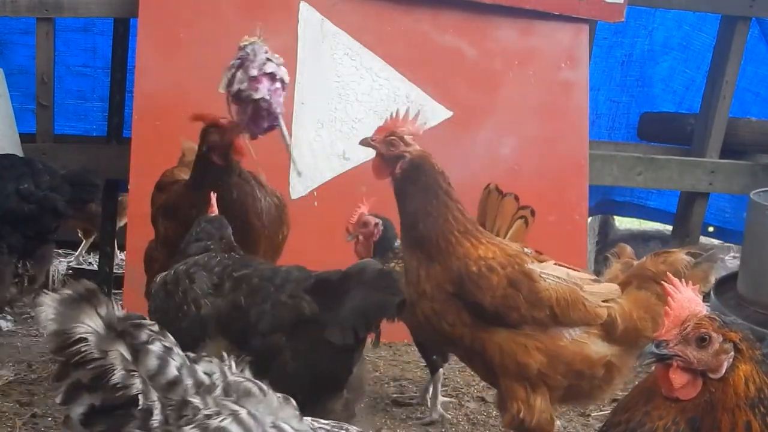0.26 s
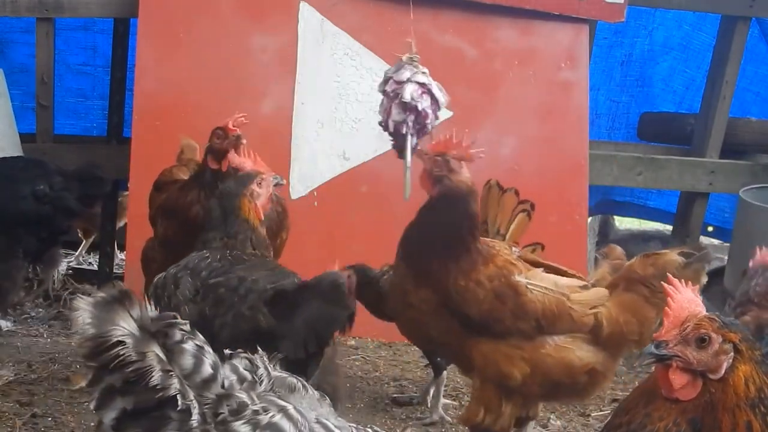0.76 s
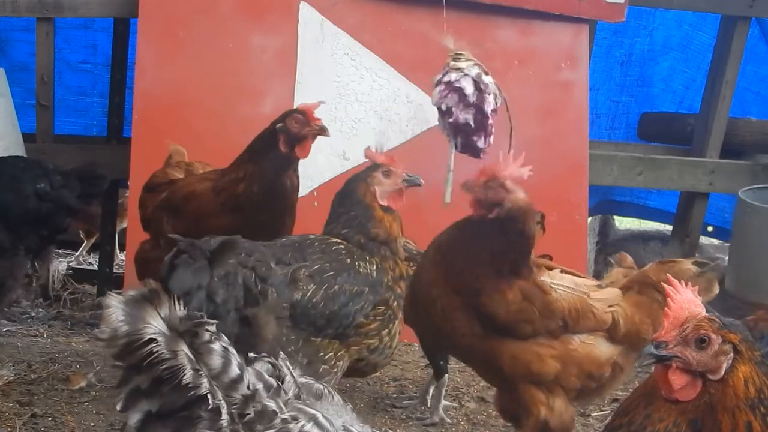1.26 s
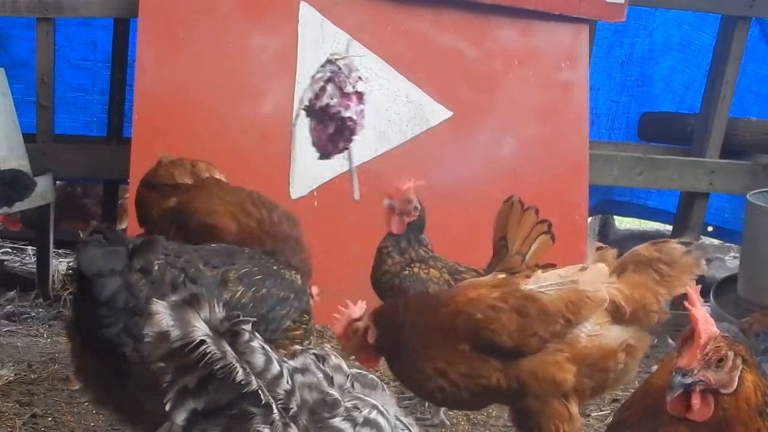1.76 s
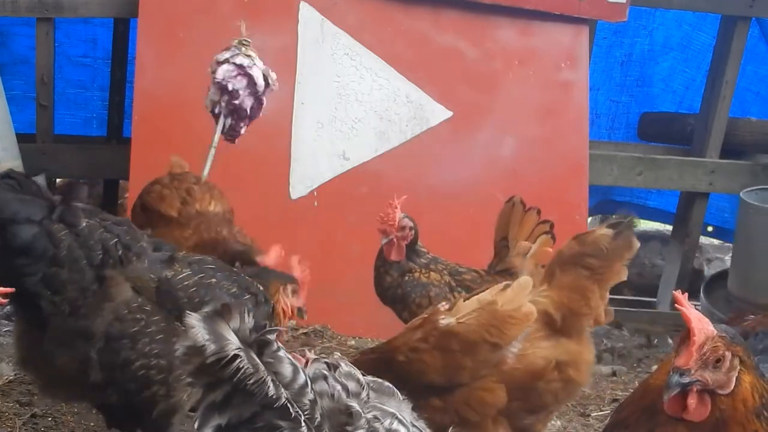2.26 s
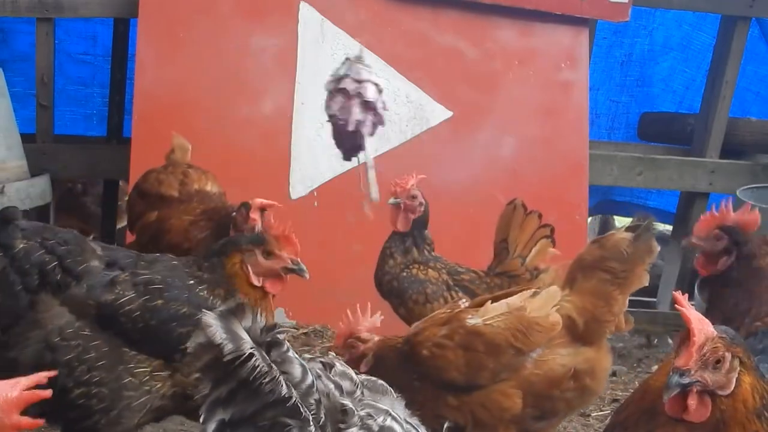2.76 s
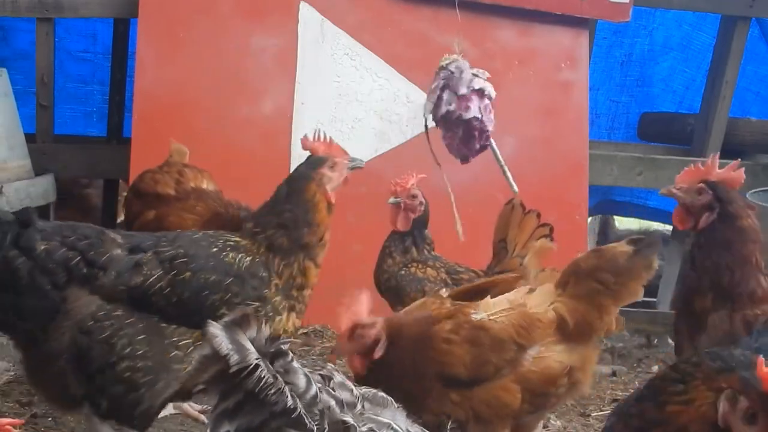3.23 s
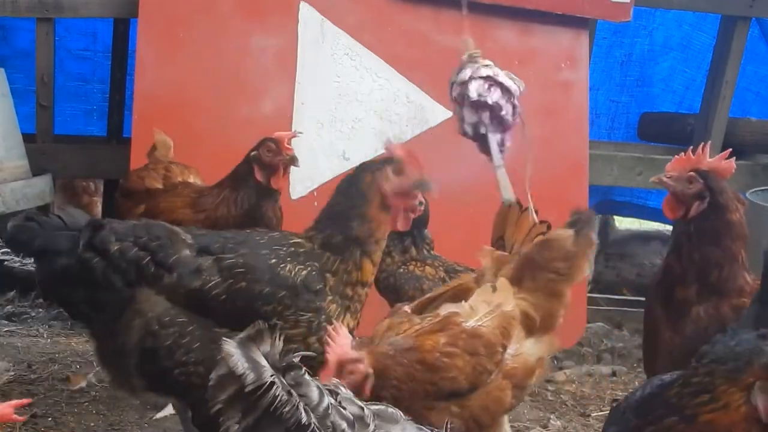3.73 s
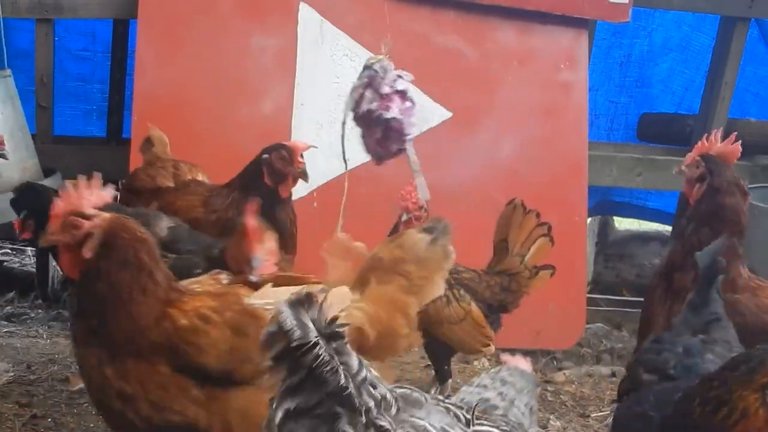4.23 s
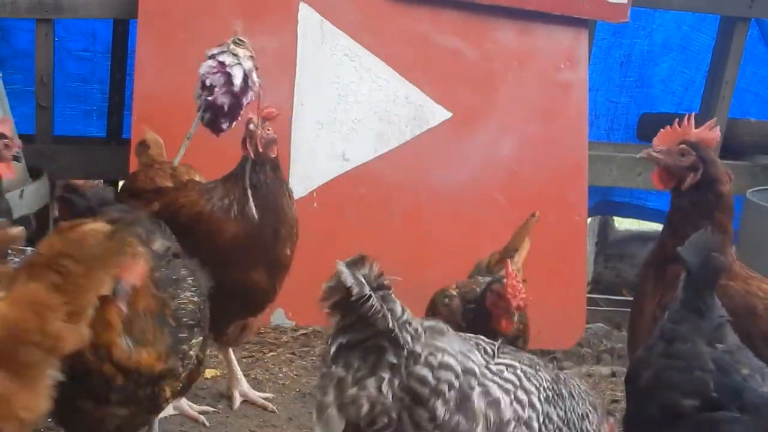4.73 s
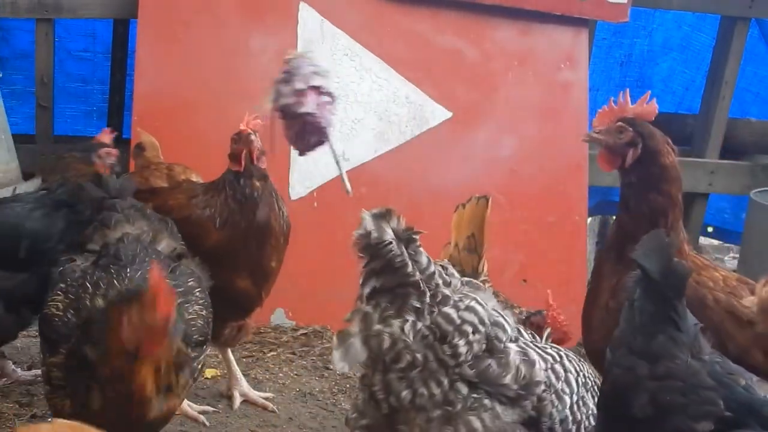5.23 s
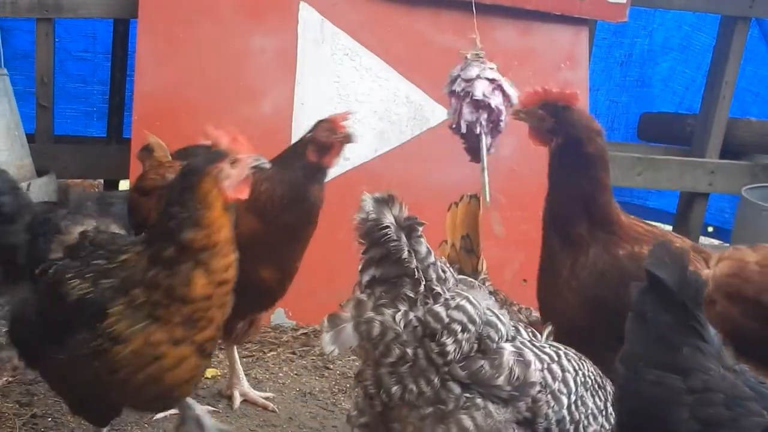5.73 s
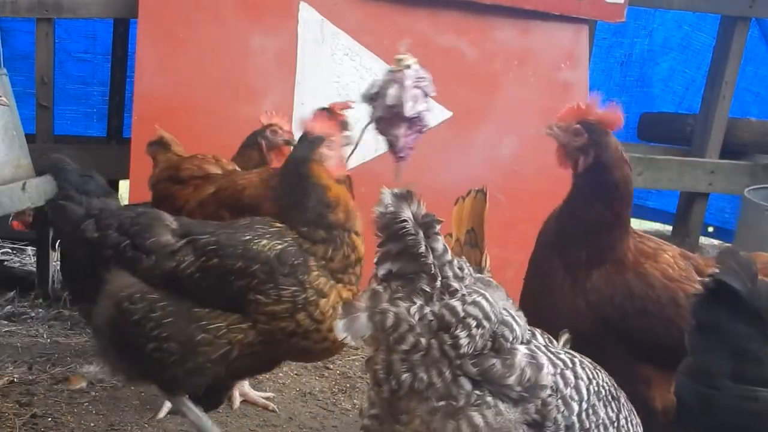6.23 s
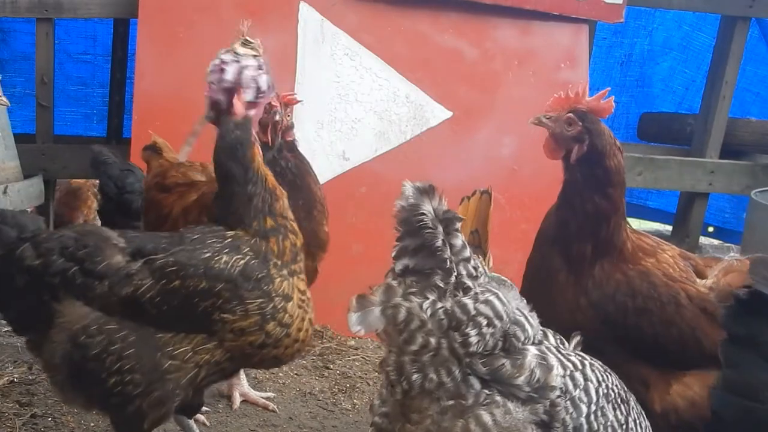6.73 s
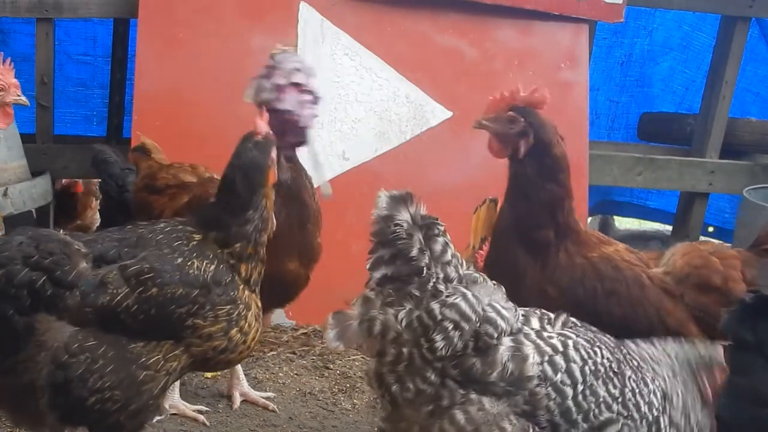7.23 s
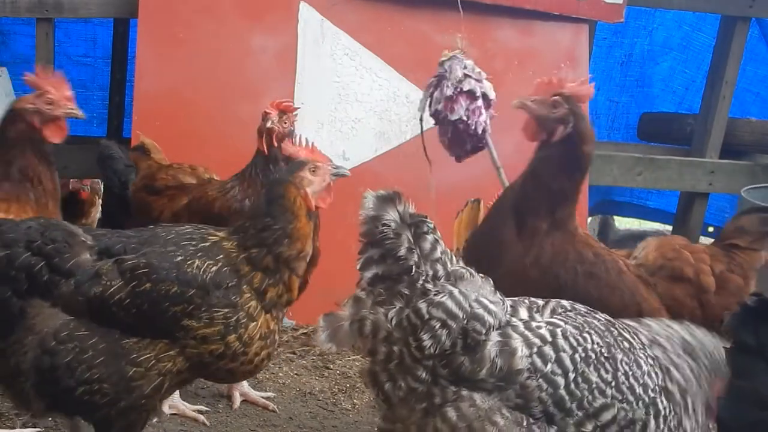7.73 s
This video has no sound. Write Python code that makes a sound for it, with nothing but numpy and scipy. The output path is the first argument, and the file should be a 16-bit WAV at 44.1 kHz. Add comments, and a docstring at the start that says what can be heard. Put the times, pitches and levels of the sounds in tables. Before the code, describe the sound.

Close stereo pickup in an outdoor hen run with quiet air and a faint wavering low hum. One hen's harsh squawk swells for over a second and cuts off. After a pause comes a rattling growl, then a moan stepping upward in pitch, amid beak snaps, knocks, feather brushes and boomy bumps near the microphone. Afterwards, scattered soft clucks, some distant, and dry little pecks continue to the end.

```python
"""A low hum wavers under outdoor air while hens crowd round a vegetable hung on a string in a backyard run.
One gives a long harsh squawk; later one growls, then moans upward in pitch; others cluck farther off.
Beaks peck, feathers brush past, short knocks and scuffs ring, and bumps near the microphone boom briefly.
Voices are rough pulse trains through throat resonances; contacts are decaying or grainy noise;
bumps are decaying low modes, the hum an unsteady tone with its octave, the air shaped noise."""
import sys
import numpy as np
from scipy import signal
from scipy.fft import rfft, irfft
from scipy.io import wavfile
from scipy.ndimage import uniform_filter1d

SR = 44100
rng = np.random.default_rng(int(sys.argv[2]) if len(sys.argv) > 2 else 0)


def to_wav(sig):
    """Store sig (one row per channel, or 1-D mono) as 16-bit WAV at the path in sys.argv[1].

    Samples outside -1..1 are clipped; the rate is SR.
    """
    pcm = np.clip(np.atleast_2d(sig), -1, 1) * 32767
    pcm = np.round(pcm).astype(np.int16)
    wavfile.write(sys.argv[1], SR, pcm.T)  # frames by channels


N = 351918
TIME_S = np.arange(N) / SR
FILTER_HZ = np.arange(2049) * SR / 4096 + 1  # 1 Hz offset keeps the log axis finite

# Background noise spectra: (frequency [Hz], relative density [dB])
RUMBLE_SPECTRUM = [(20, -31), (33, -21), (45, 0), (60, -14), (76, -12.5), (100, -3), (130, -5), (155, -20),
                   (185, -12.5), (225, -16), (300, -21), (450, -28), (700, -54.5)]
AIR_SPECTRUM = [(200, -14), (450, 2), (900, 0.5), (1400, 0), (2100, -0.5), (2800, -4.5), (4200, -7.5),
                (5200, -6.5), (5750, 0.5), (6500, -14), (7600, -7.5), (9500, -19), (11000, -20.5),
                (16000, -33.5)]
# Left-right likeness of the background: (frequency [Hz], likeness [0-1])
LIKENESS = [(100, 1), (300, 0.72), (1000, 0.63), (3000, 0.53), (8000, 0)]
# Slow course of the hum: (time [s], pitch [Hz], level [dB])
HUM_COURSE = [(0.0, 108.6, -40.5), (0.33, 104.0, -33.5), (0.81, 103.9, -45.5), (2.12, 103.0, -39),
              (2.61, 110.4, -49.5), (2.77, 109.4, -36), (3.09, 108.7, -44), (3.42, 112.3, -31),
              (4.23, 113.6, -44.5), (4.4, 105.5, -46.5), (4.56, 106.7, -36.5), (5.05, 110.7, -43.5),
              (5.21, 108.6, -36), (6.19, 112.8, -42.5), (7.0, 115.2, -39.5), (7.33, 112.2, -32),
              (7.65, 114.9, -41), (7.98, 110.5, -32)]
# Bumps near the microphone: (time [s], relative level [dB])
BUMPS = [(3.739, -20), (3.801, -26.5), (3.896, -14), (3.922, -13.5), (4.085, -29.5)]
# Their booming modes: (frequency [Hz], relative level [dB], 60 dB decay [s])
BOOM_MODES = [(48.3, -18, 0.77), (87, 1, 0.18), (112, -2, 0.16), (122.8, -0.5, 0.43), (186, -0.5, 0.048)]
# Short knocks and scuffs: (time [s], relative level [dB], 60 dB decay [s], strongest ring [Hz])
KNOCKS = [(2.627, -36.5, 0.043, 1420), (3.737, -23.5, 0.046, 860), (3.802, -37, 0.21, 990),
          (3.897, -29.5, 0.12, 1900), (3.924, -31, 0.058, 1820), (7.147, -30, 0.06, 1930),
          (7.183, -40.5, 0.065, 1970)]
# Resonances shared by the knocks: (centre [Hz], width [Hz], relative level [dB])
KNOCK_MODES = [(490, 320, -6), (930, 330, -4), (1190, 230, -4), (1940, 310, -3.5), (3280, 1170, -12)]
# Beak tips snapping: (time [s], relative level [dB], 60 dB decay [s])
PECKS = [(0.323, -41.5, 0.07), (.54, -42.5, .057), (3.065, -42.5, .034), (3.615, -22.5, 0.024),
         (3.737, -28.5, 0.033), (3.883, -37.5, .17), (4.057, -30, .05), (4.303, -26.5, .023),
         (4.41, -38.5, 0.04), (5.132, -23.5, 0.063), (5.186, -32.5, 0.016), (5.382, -21.5, 0.01),
         (5.613, -33.5, 0.03), (5.724, -26, 0.022), (5.867, -35.5, 0.049), (5.882, -26, 0.015),
         (5.98, -34.5, 0.018), (6.108, -41, 0.028), (6.177, -40, 0.078), (6.25, -39, 0.027),
         (7.185, -40.5, 0.036), (7.244, -29.5, 0.019), (7.296, -33, 0.022), (7.928, -30.5, 0.019)]
# Feathers and leaves brushing: (time [s], length [s], relative level [dB])
RUSTLES = [(1.088, 0.028, -36.5), (3.569, 0.016, -37), (3.617, .026, -33.5), (3.72, 0.14, -41),
           (3.803, 0.032, -29), (3.906, 0.025, -38.5), (4.262, .05, -38.5), (4.444, 0.11, -50),
           (5.129, 0.028, -34.5), (5.147, 0.29, -49.5), (5.567, 0.093, -41.5), (5.708, 0.03, -33.5),
           (7.078, 0.21, -51.5), (7.608, 0.023, -49.5)]
# Colour of small dry contacts: (frequency [Hz], relative gain [dB])
CONTACT_COLOUR = [(300, -33), (1500, -10.5), (2800, -8.5), (4000, -6), (5200, -1.5), (5800, 5.5),
                  (6600, -12), (7700, -5), (9500, -26), (12000, -25), (16000, -36)]
# Clucks: (time [s], length [s], pitch [Hz], glide [octaves], throat [Hz], level [dB], roughness [0-1],
# scattered sound [dB re direct])
CLUCKS = [(.155, .017, 406, -.07, 700, -34.5, 0.25, -11), (4.494, 0.062, 269, -0.021, 940, -36, 0.73, -16),
          (4.68, 0.029, 562, 0.51, 820, -41.5, 0.36, -2.5),
          (4.767, 0.025, 384, -0.15, 980, -43.5, 0.27, -9), (4.849, 0.029, 584, 0.3, 850, -33.5, 0.33, -12),
          (5.112, 0.042, 343, -0.16, 1080, -41.5, 0.46, -5), (5.385, 0.031, 553, -0.21, 1180, -47, 0.5, -6),
          (5.737, 0.027, 342.4, 0.038, 1067, -46, 0.7, -2), (6.013, 0.068, 407, .1, 1247, -54.5, 0.6, -4),
          (6.365, 0.041, 380, 0.18, 1040, -52, 0.9, 2), (6.507, 0.07, 386.3, -.15, 1070, -43.5, 0.67, 1),
          (6.574, 0.056, 342, -0.25, 1000, -38, 0.44, -2.5), (6.755, 0.048, 343, -0.29, 980, -42, 0.4, 0),
          (6.981, 0.034, 580, -0.22, 1600, -46, 0.48, -11), (6.996, .065, 585, -.28, 1240, -44, 0.3, -0.5),
          (7.324, 0.053, 592, -0.19, 1090, -46.5, 0.63, -2), (7.544, 0.055, 700, -0.25, 2010, -52, .15, 4),
          (7.604, 0.051, 319.5, -0.29, 1200, -35.5, 0.52, -3),
          (7.791, 0.049, 601, -0.27, 1080, -44, 0.38, 0)]
# Clucking throat: (multiple of throat frequency [ratio], width [Hz], relative level [dB])
CLUCK_THROAT = [(.64, 214, -4), (1, 267, 0.5), (1.4, 350, -18), (2, 402, -15.5), (4, 1200, -27)]
# Rising moan: (time [s], pitch [Hz], roughness [0-1])
MOAN_COURSE = [(3.66, 273.4, 0.25), (3.95, 269.8, 0.07), (4.135, 289.6, 0.17), (4.148, 376.6, .25),
               (4.19, 387.7, 0.02), (4.245, 444, 0.13), (4.285, 419, 0.5), (4.33, 486, 0.3), (4.36, 483, 0),
               (4.405, 577, .25)]
# Moaning throat: (centre [Hz], width [Hz], relative level [dB])
MOAN_THROAT = [(280, 125, 4), (553, 70, 0), (757, 35, 4.5), (930, 92, 3), (1143, 69, -4.5), (1396, 145, -6)]
# Growl: (time [s], effort level [dB], beak resonance [Hz])
GROWL_COURSE = [(3.265, -56, 1900), (3.28, -39, 1890), (3.32, -39, 1470), (3.35, -35.5, 950),
                (3.48, -33.5, 890), (3.53, -31, 1260), (3.6, -34.5, 1000), (3.69, -48, 900)]
# Growling throat, lower and upper resonances: (centre [Hz], width [Hz], relative level [dB])
GROWL_LOW = [(251, 58, 2), (460, 160, -1.5), (617, 97, 6.5), (740, 38, 1), (937, 63, 4), (1230, 170, -18),
             (2110, 400, -13)]
GROWL_HIGH = [(2860, 170, 1), (3210, 110, 6), (3570, 170, -2), (4500, 500, -6), (5820, 290, -1.5)]
# Squawk: (time [s], throat level [dB], harsh-middle level [dB])
SQUAWK_COURSE = [(.48, -66, -59), (.55, -52.5, -55.5), (.70, -49.5, -58.5), (.92, -41.5, -52.5),
                 (1.15, -38.5, -51), (1.26, -36.5, -40), (1.5, -35.5, -43), (1.68, -34.5, -47),
                 (1.735, -71, -67)]
# Shrill bursts within the squawk: (time [s], length [s], level [dB])
SHRILL_BURSTS = [(1.218, 0.029, -35.5), (1.267, 0.022, -37), (1.306, 0.015, -35), (1.339, 0.018, -37.5),
                 (1.427, 0.027, -34.5), (1.518, 0.022, -33), (1.612, 0.013, -35), (1.655, 0.015, -34)]
# Squawking throat, lower, harsh-middle and upper resonances: (centre [Hz], width [Hz], relative level [dB])
SQUAWK_LOW = [(554, 63, -4), (1247, 124, -1), (1517, 74, -9.5), (1662, 76, -8), (1980, 740, -20.5)]
SQUAWK_HARSH = [(250, 120, -1), (540, 170, 0), (746, 54, 6.5), (987, 130, -2), (1480, 530, -4)]
SQUAWK_HIGH = [(3700, 360, -17), (4060, 370, -3), (4710, 45, -2.5), (5140, 204, -8), (5760, 120, -9.5),
               (6200, 140, -6.5), (7707, 1000, -20)]
# Microphone ports, the right with more bass, the left with more treble: (frequency [Hz], left minus right [dB])
PORT_BALANCE = [(40, -3.5), (500, -3), (1300, -2.4), (2500, -1), (5000, 2), (8000, 1.4), (12000, 0.5)]


def from_db(db):
    """Decibels to amplitude gain."""
    return 10 ** (np.asarray(db) / 20)


def rms_one(x):
    """Scale to unit power."""
    return x / np.sqrt(np.mean(x ** 2) + 1e-20)


def in_time(rows):
    """Interpolate each column over the scene's time."""
    time_s, *columns = np.transpose(rows)
    return [np.interp(TIME_S, time_s, column) for column in columns]


def during(rows):
    """Gate open from first row to last, with 10 ms ramps inside."""
    start_s, end_s = rows[0][0], rows[-1][0]
    return np.interp(TIME_S, [start_s, start_s + .01, end_s - .01, end_s], [0, 1, 1, 0])


def add(out, time_s, x):
    """Mix a short sound in at a given time."""
    i = int(time_s * SR)
    out[i:i + len(x)] += x[:max(N - i, 0)]


def drift(rate_hz, size=N):
    """Random curve of unit spread, straight between knots at the given rate."""
    steps = np.arange(size) * rate_hz / SR
    knots = rng.standard_normal(size // 8 + 4)
    return 1.22 * np.interp(steps, np.arange(len(knots)), knots)  # 1.22 restores the spread


def even(x):
    """Hold the RMS level near 1 over 30 ms."""
    return x / np.sqrt(np.abs(uniform_filter1d(x * x, 1323)) + 1e-12)


def swell(length_s):
    """Rounded rise and fall."""
    return np.sin(np.linspace(0, np.pi, max(int(length_s * SR), 16))) ** 2


def at_hz(points, hz):
    """Read a spectrum on a log-frequency axis."""
    points_hz, values = np.transpose(points)
    return np.interp(np.log(hz), np.log(points_hz), values)


def colour(x, gain):
    """Causal (minimum-phase) filter with the given gain at FILTER_HZ."""
    cepstrum = irfft(np.log(gain + 1e-6))
    half = len(cepstrum) // 2
    folded = np.r_[cepstrum[0], 2 * cepstrum[1:half]]
    impulse = irfft(np.exp(rfft(folded, 2 * half)))[:half]
    return signal.oaconvolve(x, impulse)[:len(x)]


def resonate(x, modes):
    """Parallel resonances with steep skirts, summed in power."""
    power = np.zeros(len(FILTER_HZ))
    for centre_hz, width_hz, db in modes:
        offset = (FILTER_HZ - centre_hz) / width_hz
        power += from_db(2 * db) / (1 + 2 * offset ** 2) ** 2
    return colour(x, np.sqrt(power))


def sliding(x, centre_hz, width_hz):
    """One moving resonance: shift it to 0 Hz, low-pass, shift back."""
    turn = np.exp(2j * np.pi * np.cumsum(centre_hz) / SR)
    lowpass = signal.butter(2, width_hz / 2, fs=SR, output="sos")
    return np.real(turn * signal.sosfilt(lowpass, x / turn))


def burst(t60_s, attack_s=0.00071):
    """A crack of noise that dies away exponentially."""
    t = TIME_S[:SR // 4]
    decay = from_db(-60 * t / max(t60_s, .004))
    return rng.standard_normal(len(t)) * decay * (1 - np.exp(-t / max(attack_s, 1e-5)))


def syrinx(pitch_hz, rough, jitter=.13, rasp=1.0):
    """One pulse a cycle; roughness unsettles period and strength and lets air noise through."""
    size = len(pitch_hz)
    phase = np.cumsum(pitch_hz * np.exp(jitter * rough * drift(500, size))) / SR
    distance_samples = (phase % 1 - .5) * SR / pitch_hz
    pulses = rms_one(np.exp(-distance_samples ** 2 / 2)) * from_db(4.2 * rough * drift(300, size))
    air = rng.standard_normal(size) * (1 - np.cos(2 * np.pi * phase))
    return pulses + rasp * rough * air


def reflections(x, t60_s):
    """Sound scattered by the walls of the run: a decaying noise tail, partly alike left and right."""
    t = TIME_S[:SR // 3]
    tail = rng.standard_normal((2, len(t))) * from_db(-60 * t / t60_s) * (t > .003)
    tail = tail + 0.69 * tail[::-1]
    tail /= np.sqrt(np.sum(tail ** 2, axis=1, keepdims=True))
    return signal.oaconvolve(x[None], tail, axes=1)[:, :N]


def place(x, pan_db, wet_db, t60_s=0.16):
    """Add a source's reflections and pan both; positive is left."""
    wet = from_db(wet_db) * reflections(x, t60_s)
    return (x + wet) * from_db([[pan_db / 2], [-pan_db / 2]])


def background(spectrum, level_db):
    """Steady outdoor noise from mid and side parts, less alike left and right toward the treble."""
    hz = np.arange(N // 2 + 1) * SR / N + 1
    alike = np.clip(at_hz(LIKENESS, hz), 0, 1)
    mid, side = rfft(rng.standard_normal((2, N))) * from_db(at_hz(spectrum, hz))
    stereo = np.sqrt(1 + alike) * mid + np.sqrt(1 - alike) * side * [[1], [-1]]
    return from_db(level_db) * rms_one(irfft(stereo, N))


def hum(octave_db=-22, throb_share=0.51, throb_rate_hz=17):
    """A low tone and its octave wander in pitch; random modulation throbs, at times almost to nothing."""
    pitch_hz, slow_db = in_time(HUM_COURSE)
    turn = np.exp(2j * np.pi * np.cumsum(pitch_hz) / SR)
    throb = 1 + throb_share * (drift(throb_rate_hz) + 1j * drift(throb_rate_hz))
    tone = np.real(throb * (turn + from_db(octave_db) * turn ** 2))
    return from_db(slow_db) * rms_one(tone)


def bumps(onset_s=0.0029):
    """Soft heavy contacts set a few low modes booming."""
    out, t = np.zeros(N), TIME_S[:SR // 2]
    boom = np.zeros(len(t))
    for hz, db, t60_s in BOOM_MODES:
        boom += from_db(db - 60 * t / t60_s) * np.sin(2 * np.pi * hz * t)
    boom *= 1 - np.exp(-(t / onset_s) ** 2)
    for time_s, db in BUMPS:
        add(out, time_s, from_db(db) * boom)
    return out


def knocks(ring_width_hz=260, gain_db=15.5):
    """Short noise bursts excite shared resonances; each knock has its own strongest ring."""
    out = np.zeros(N)
    for time_s, db, t60_s, ring_hz in KNOCKS:
        blow = burst(t60_s, attack_s=0.0016)
        ring = resonate(blow, KNOCK_MODES + [(ring_hz, ring_width_hz, 0)])
        add(out, time_s, from_db(db + gain_db) * ring)
    return out


def pecks_and_feathers(litter_per_s=30, litter_db=-49, grain_db=5.0, gain_db=7.5):
    """Beak snaps, grainy brushing and feet ticking in dry litter: noise with one contact colour."""
    out = np.zeros(N)
    for time_s, db, t60_s in PECKS:
        add(out, time_s, from_db(db) * burst(t60_s))
    for time_s, length_s, db in RUSTLES:
        shape = swell(length_s)
        grains = rng.standard_normal(len(shape)) * from_db(grain_db * drift(600, len(shape)))
        add(out, time_s, from_db(db) * shape * rms_one(grains))
    tick_db = litter_db + 3.5 * rng.standard_normal(N).clip(-2, 2)
    ticks = (rng.random(N) < litter_per_s / SR) * from_db(tick_db)
    out += signal.fftconvolve(ticks, burst(0.021))[:N]
    return colour(out, from_db(at_hz(CONTACT_COLOUR, FILTER_HZ) + gain_db))


def clucks(chest_hz=260, chest_db=-17, beak_share=0.29):
    """Short gliding notes; the farther the hen, the less chest and the more scattered sound."""
    direct, scattered = np.zeros((2, N))
    for time_s, length_s, pitch_hz, glide, throat_hz, db, rough, scatter_db in CLUCKS:
        shape = np.sqrt(swell(length_s))
        bend = 2 ** (glide * np.linspace(-.5, .5, len(shape)))
        voice = syrinx(pitch_hz * bend, rough)
        modes = [(multiple * throat_hz, width_hz, mode_db) for multiple, width_hz, mode_db in CLUCK_THROAT]
        modes.append((chest_hz, 90, chest_db - scatter_db))
        body = rms_one(resonate(voice, modes))
        # the beak's resonance slides along with the pitch
        beak = rms_one(sliding(voice, throat_hz * bend ** 2, width_hz=660))
        note = from_db(db) * shape * rms_one(body + beak_share * beak)
        add(direct, time_s, note)
        add(scattered, time_s, from_db(scatter_db) * note)
    return direct + reflections(scattered, t60_s=0.3)


def moan(waver=0.00828, start_db=-43, db_per_octave=4, attack_s=0.077, release_s=0.027,
         break_db=-5, break_octaves_per_s=15):
    """A note breaks upward in steps, louder as it climbs; roughness alternates strong and weak cycles."""
    pitch_hz, rough = in_time(MOAN_COURSE)
    attack = np.clip((TIME_S - MOAN_COURSE[0][0]) / attack_s, 0, 1)
    release = np.clip((MOAN_COURSE[-1][0] - TIME_S) / release_s, 0, 1) ** 2
    octaves = np.log2(pitch_hz / pitch_hz[0])
    # the note thins out where its pitch jumps
    octaves_per_s = uniform_filter1d(np.abs(np.gradient(octaves)) * SR, size=900)
    jumping = np.minimum(octaves_per_s / break_octaves_per_s, 1)
    level_db = start_db + db_per_octave * octaves + break_db * jumping
    alternate = 1 + 1.2 * rough * np.cos(np.pi * np.cumsum(pitch_hz) / SR)
    voice = syrinx(pitch_hz * (1 + waver * drift(70)), rough) * alternate
    return from_db(level_db) * even(resonate(voice, MOAN_THROAT)) * attack * release


def growl(pitch_hz=150, rattle_hz=56, rattle_depth_db=8, low_share=0.52, low_trim_db=-1.5,
          full_effort_db=-30.5, high_full_db=-43, high_db_per_db=2.1,
          beak_db=-5.5, beak_top_hz=3400, beak_top_db=-3, beak_octaves_per_db=.045):
    """Low ragged pulses; a slower rattle chops the upper resonances most, and effort opens the beak."""
    level_db, beak_hz = in_time(GROWL_COURSE)
    effort_db = level_db - full_effort_db
    top_hz = beak_top_hz * 2 ** (beak_octaves_per_db * effort_db)
    voice = syrinx(pitch_hz * 2 ** (.2 * drift(35)), rough=.75)
    rattle = np.sin(2 * np.pi * np.cumsum(rattle_hz * (1 + .15 * drift(40))) / SR)
    throat = voice * from_db(low_share * rattle_depth_db * rattle)
    chopped = voice * from_db(rattle_depth_db * rattle)
    low = even(resonate(throat, GROWL_LOW))
    low += from_db(beak_db) * even(sliding(throat, beak_hz, width_hz=340))
    high = even(resonate(chopped, GROWL_HIGH))
    high += from_db(beak_top_db) * even(sliding(chopped, top_hz, width_hz=470))
    high_db = high_full_db + high_db_per_db * effort_db
    return (from_db(level_db + low_trim_db) * low + from_db(high_db) * high) * during(GROWL_COURSE)


def squawk(pitch_hz=315, rough=.9, shrill_hz=513, waver=0.0257, quiver_rate_hz=30,
           full_effort_db=-36, high_full_db=-45, high_db_per_db=1.8,
           slide_hz=968, slide_octaves=0.26, slide_rate_hz=28, slide_db=-1):
    """Chaotic pulses through throat resonances, cracking now and then into a shrill buzz."""
    low_db, harsh_db = in_time(SQUAWK_COURSE)
    high_db = high_full_db + high_db_per_db * (low_db - full_effort_db)
    voice = syrinx(np.full(N, pitch_hz), rough)
    throat = from_db(low_db) * even(resonate(voice, SQUAWK_LOW))
    throat += from_db(high_db) * even(resonate(voice, SQUAWK_HIGH))
    # a quiver bends the lower and upper voice together in pitch and resonance
    quiver = uniform_filter1d(drift(quiver_rate_hz), size=700)
    out = np.interp(TIME_S + waver / quiver_rate_hz * quiver, TIME_S, throat)
    # pushed hard, the membranes flap out of step and fill the middle
    flapping = syrinx(np.full(N, pitch_hz), rough=1.1)
    wander_hz = slide_hz * 2 ** (slide_octaves * drift(slide_rate_hz))
    out += from_db(harsh_db) * even(resonate(flapping, SQUAWK_HARSH))
    out += from_db(harsh_db + slide_db) * even(sliding(flapping, wander_hz, width_hz=170))
    for time_s, length_s, db in SHRILL_BURSTS:
        shape = np.sqrt(swell(length_s))
        buzz = resonate(syrinx(np.full(len(shape), shrill_hz), rough=0.22), SQUAWK_HIGH)
        add(out, time_s, from_db(db) * shape * rms_one(buzz))
    return out * during(SQUAWK_COURSE)


def scene():
    """Hens at their places over contacts, hum and air."""
    out = background(RUMBLE_SPECTRUM, level_db=-44.5) + background(AIR_SPECTRUM, level_db=-52.0)
    out += hum()
    out += place(bumps(), pan_db=-2.5, wet_db=-15, t60_s=0.13)
    out += place(knocks(), pan_db=-1.5, wet_db=-1.5, t60_s=0.074)
    out += place(pecks_and_feathers(), pan_db=-.4, wet_db=-8.5, t60_s=0.34)
    out += clucks()
    out += place(moan(), pan_db=0.0, wet_db=-9.0)
    out += place(growl(), pan_db=0.2, wet_db=-7)
    out += place(squawk(), pan_db=1.1, wet_db=-7.5)
    return out


def record(dry, notch_hz=2500, notch_q=6, low_cut_hz=30, high_cut_hz=15900):
    """Two differently coloured ports, the right a sample late; a narrow midrange notch, both ends cut."""
    tilt = from_db(at_hz(PORT_BALANCE, FILTER_HZ) / 2)
    left = colour(dry[0], tilt)
    right = colour(np.r_[0, dry[1, :-1]], 1 / tilt)
    out = signal.lfilter(*signal.iirnotch(notch_hz, notch_q, fs=SR), np.array([left, right]))
    out = signal.sosfilt(signal.butter(4, low_cut_hz, "high", fs=SR, output="sos"), out)
    return signal.sosfilt(signal.ellip(10, .1, 90, high_cut_hz, fs=SR, output="sos"), out)


dry = scene()
out = record(dry)
to_wav(out)
```